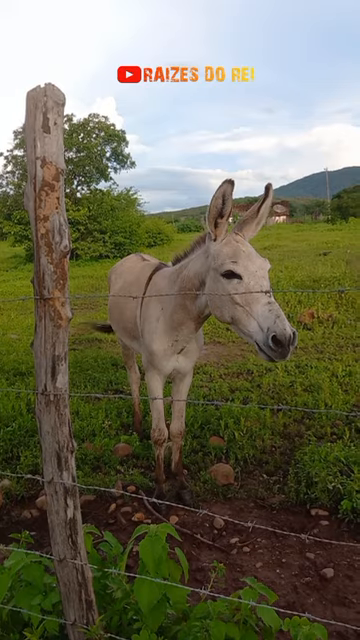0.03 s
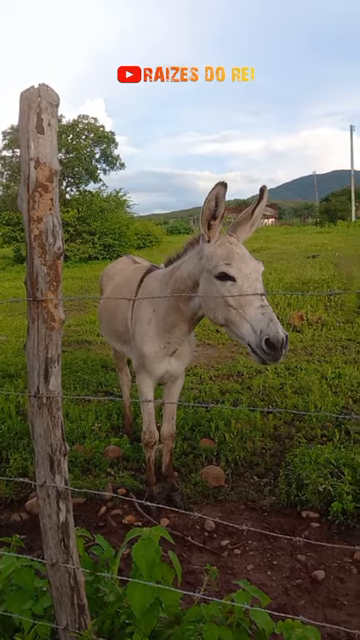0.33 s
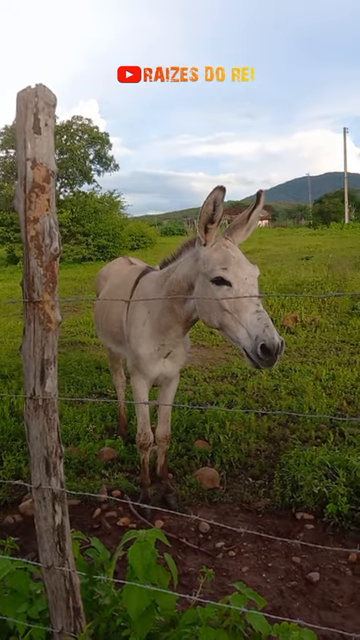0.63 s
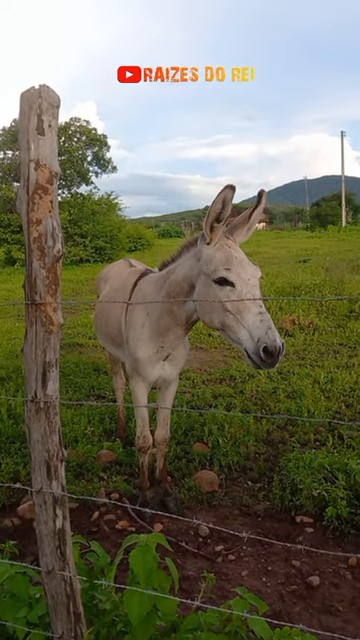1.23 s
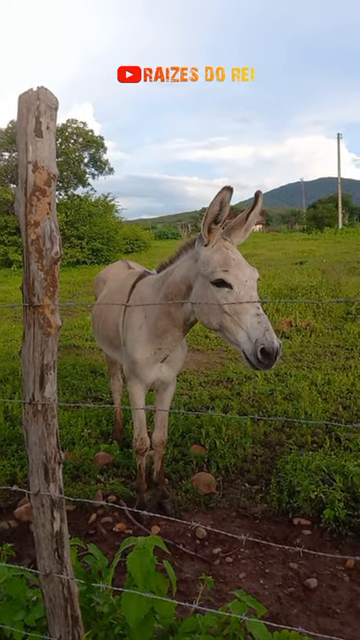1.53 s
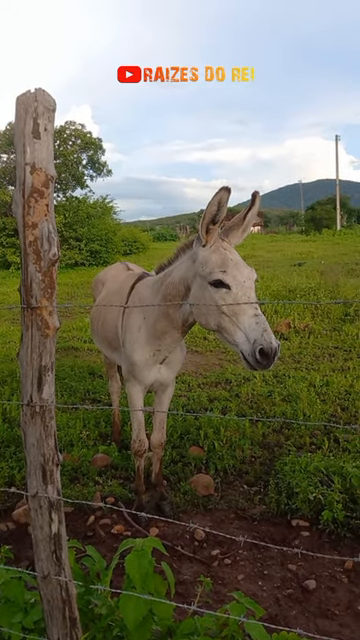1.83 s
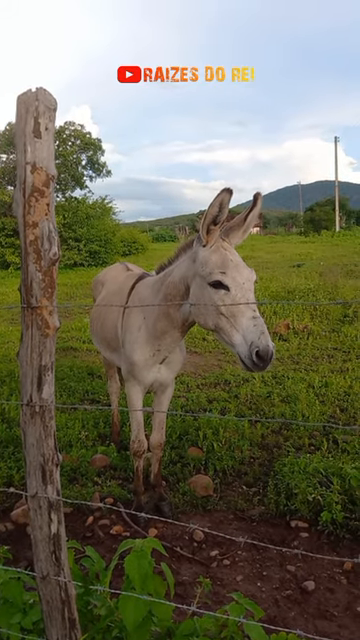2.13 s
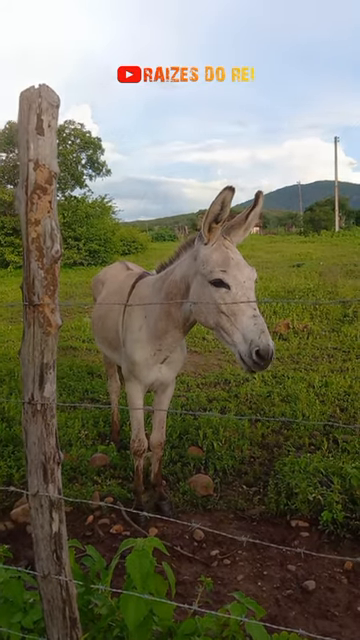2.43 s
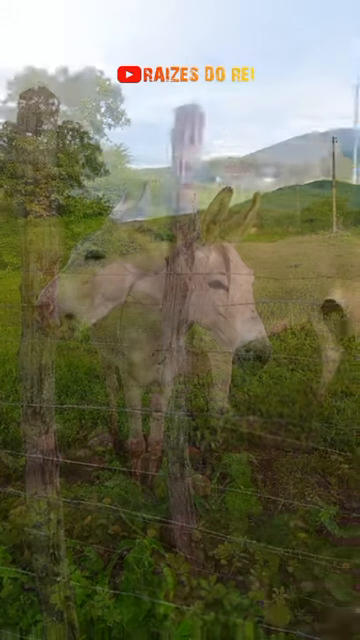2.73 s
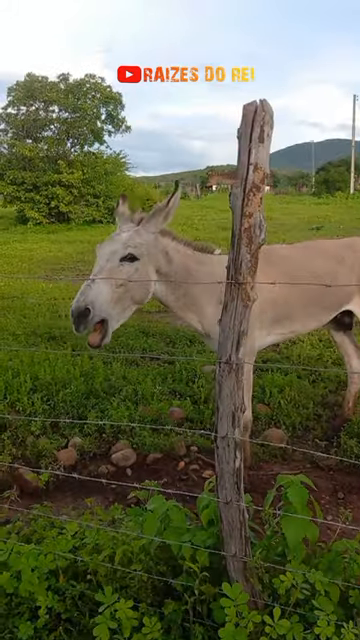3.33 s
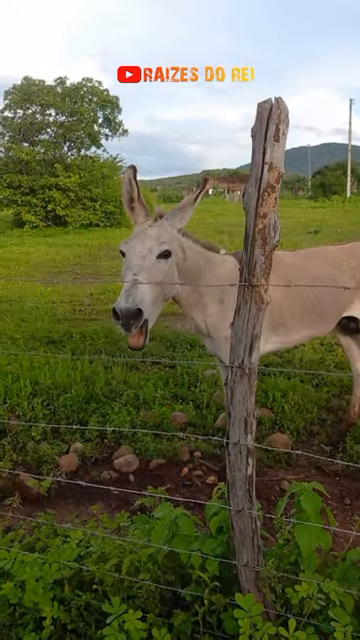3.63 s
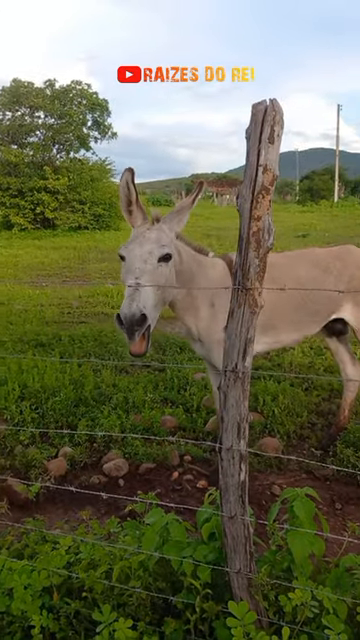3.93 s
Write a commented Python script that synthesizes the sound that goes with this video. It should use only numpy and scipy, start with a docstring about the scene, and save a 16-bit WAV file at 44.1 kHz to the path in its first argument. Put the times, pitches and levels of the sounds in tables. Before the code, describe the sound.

A donkey close to the microphone gives four fluttering grunts between wheezy gasps, moans softly, then brays a loud, whistling hee-haw-hee. Further off in a quiet field, a bird repeats a faint falling cry.

```python
"""An open pasture, where a donkey at a fence works up to a bray: four fluttering grunts with wheezy
gasps between, a soft moan, then hee - haw - hee. Each hee is a whistle over rasping air drawn through
tight vocal folds, the haw is a clean brassy out-stroke, and the voice croaks where it changes register.
Further off, a bird repeats an arched, falling cry over the low hush of the field."""
import sys
import numpy as np
from scipy import signal
from scipy.fft import rfft, irfft
from scipy.io import wavfile

SR = 44100
rng = np.random.default_rng(int(sys.argv[2]) if len(sys.argv) > 2 else 0)


def bounce(signal):
    """Save signal as a 16-bit WAV file at the path given by the first command-line argument."""
    frames = np.transpose(np.atleast_2d(signal))
    limited = np.clip(frames, -1, 1)
    pcm = np.round(limited * 32767).astype(np.int16)
    wavfile.write(sys.argv[1], SR, pcm)


N = 176400
T, HZ = np.arange(N) / SR, np.fft.rfftfreq(N) * SR


def from_db(db):
    """Decibels to gain."""
    return 10 ** (np.asarray(db) / 20)


def unit_rms(x):
    """Scale to an rms of 1."""
    return x / np.sqrt(np.mean(x ** 2) + 1e-20)


def at_hz(curve, hz):
    """Read a curve of (frequency, value) points on a log-frequency axis."""
    freqs, values = np.transpose(curve)
    return np.interp(np.log(hz + 1e-3), np.log(freqs), values)


def filtered(x, hz, kind="low", order=2):
    """Butterworth filter."""
    return signal.sosfilt(signal.butter(order, hz, kind, fs=SR, output="sos"), x)


def wobble(rate_hz):
    """Smooth random modulation, rms 1."""
    return unit_rms(filtered(rng.standard_normal(N), rate_hz))


def air(colour, correlation=.88):
    """Stereo turbulence, rms near 1, rolled off below the first point of its colour."""
    low_cut = np.minimum(HZ / colour[0][0], 1) ** 2
    mid, side = irfft(rfft(rng.standard_normal((2, N))) * from_db(at_hz(colour, HZ)) * low_cut, N)
    width = np.sqrt((1 - correlation) / (1 + correlation))
    return unit_rms(mid) + width * unit_rms(side) * np.array([[1], [-1]])


def swell(start, hold, db, fade_db_per_s, attack_s):
    """Envelope: a ramp centred on the start, a hold, then a steady fade in dB."""
    attack = np.clip((T - start) / attack_s + .5, 0, 1)
    return attack * from_db(db - fade_db_per_s * np.maximum(T - start - hold, 0))


def tone(hz, gain, partials_db):
    """Harmonics on a pitch curve; their levels are a list or a function of frequency."""
    on, out = gain > 1e-5, np.zeros(N)
    k = np.arange(1, 21 if callable(partials_db) else len(partials_db) + 1)[:, None]
    weight = from_db(partials_db(k * hz[on]) if callable(partials_db) else np.vstack(partials_db))
    waves = np.sin(2 * np.pi * k * np.cumsum(hz[on]) / SR + np.pi * rng.random(k.shape))
    out[on] = gain[on] * sum(weight * waves) / np.sqrt(sum(weight ** 2) / 2)
    return out


def placed(x, pan, left_lead_s=.00008):
    """Pan a sound band by band, the left side arriving slightly early."""
    ratio = from_db(at_hz(pan, HZ))
    left = ratio * np.exp(2j * np.pi * HZ * left_lead_s)
    sides = np.array([left, np.ones_like(HZ)]) * 2 / (1 + ratio)
    response = np.roll(irfft(sides, N), 256, axis=1)[:, :513]
    return signal.fftconvolve(np.broadcast_to(x, (2, N)), response, "same", axes=1)


# colour of the ambience bed: (frequency [Hz], level [dB])
FIELD_AIR = [(110, 0), (500, -19), (4500, -27), (8000, -40)]

def field_hush():
    """A faint, steady bed of low air."""
    return from_db(-66) * air(FIELD_AIR)


# flap hits: (time [s], thump level [dB], puff level [dB])
FLAPS = [(.433, -23, -35), (.524, -26, -35), (.802, -24, -28), (.839, -21, -32), (.867, -17, -36),
         (1.177, -21, -23), (1.218, -18, -30), (1.244, -12, -37), (1.585, -20, -38), (1.623, -19, -27),
         (1.653, -18, -38)]
# chest resonances: (frequency [Hz], gain [dB], t60 [s])
CHEST_MODES = [(125, -13, .05), (330, 1, .025), (630, -8, .018)]
# breaths out and in: (time [s], hold [s], level [dB]); GASPS opens with a brief breath out at 0 s, the rest are
# in-breaths
GRUNTS = [(.375, .13, -39), (.795, .11, -39), (1.175, .12, -34), (1.555, .14, -35)]
GASPS = [(0, .015, -28), (.122, .135, -37), (.595, .06, -50), (.995, .05, -50)]
# their colours, dark and wheezy: (frequency [Hz], level [dB])
GRUNT_AIR = [(110, -1), (330, 0), (850, -14), (2050, -11), (2700, -27), (4700, -22), (8000, -54),
             (14500, -48)]
GASP_AIR = [(280, -10), (620, -3), (1150, -8), (1600, 2), (1780, -4), (2050, 1), (2700, -22), (4600, -14),
            (7000, -48)]
# stereo position: (frequency [Hz], left over right [dB])
GRUNT_PAN = [(300, 1), (2000, -7)]

def grunts_and_gasps(flap_hz=31, flap_depth_db=4, trim_db=-3):
    """Slow flaps thump the chest and let out puffs; air flutters out with them and is gasped back, after one
    short breath out at the very start."""
    clicks, puffs = np.zeros(N), np.zeros(N)
    for start, thump_db, puff_db in FLAPS:
        clicks[int(start * SR)] = from_db(thump_db)
        puffs += swell(start + .001, hold=.006, db=puff_db, fade_db_per_s=1500, attack_s=.001)
    soft_clicks = filtered(clicks, [70, 1100], "band")
    thumps = sum(from_db(db) * ring(soft_clicks, hz, t60) for hz, db, t60 in CHEST_MODES)
    outflow = np.zeros(N)
    for start, hold, db in GRUNTS:
        flutter = from_db(flap_depth_db * np.cos(2 * np.pi * flap_hz * (T - start)))
        outflow += swell(start, hold, db, fade_db_per_s=230, attack_s=.015) * flutter
    gasps = sum(swell(*gasp, fade_db_per_s=400, attack_s=.035) for gasp in GASPS)
    breath = outflow * air(GRUNT_AIR) + (puffs + gasps) * air(GASP_AIR)
    breath *= from_db(1.8 * wobble(60))
    return from_db(trim_db) * placed(thumps + breath, GRUNT_PAN)


def ring(x, hz, t60):
    """One resonance of chest or throat; a unit click rings at height 1."""
    radius, angle = from_db(-60 / (t60 * SR)), 2 * np.pi * hz / SR
    return signal.lfilter([0, np.sin(angle)], [1, -2 * radius * np.cos(angle), radius ** 2], x + 1e-18)


# bird cues: (time [s], level [dB])
CRIES = [(.295, -52), (.765, -45), (1.2, -40), (1.635, -42), (2.013, -47), (2.355, -49)]
# contour of one cry: (time into cry [s], pitch [Hz], relative level [dB])
CRY_CONTOUR = [(0, 950, -22), (.018, 1200, -6), (.04, 1275, 0), (.08, 1100, -1), (.115, 850, -18)]
# its harmonics, fundamental first: (level [dB])
CRY_PARTIALS = [0, -7, 0, -5, -23, -25]

def bird(jitter=.011):
    """Each cry arches up and slides down, rich in harmonics and grainy with fast pitch jitter."""
    times, pitches, contour_db = np.transpose(CRY_CONTOUR)
    grain, cries = np.exp(jitter * wobble(500)), np.zeros(N)
    for start, db in CRIES:
        hz = np.interp(T, start + times, pitches) * grain
        gain = from_db(db + np.interp(T, start + times, contour_db, -np.inf, -np.inf))
        cries += tone(hz, gain, CRY_PARTIALS)
    return cries


# the soft moan and the brassy haw: (time [s], hold [s], pitch [Hz], level [dB])
MOAN = (2.282, .125, 417, -43)
HAW = (3.077, .285, 300, -15.5)
# their harmonics, fundamental first: (level [dB])
MOAN_PARTIALS = [0, -2, -10, -24]
HAW_PARTIALS = [0, -15, -9, -26, -2, -18, -27, -20, -33, -42, -48, -38, -31, -29, -42, -39]
# throat formants, shared with the croaks: (frequency [Hz], level [dB])
THROAT = [(350, 0), (560, -9), (950, 3), (1380, -2), (1700, -14), (2200, -9), (2700, -27), (3800, -17),
          (4800, -22), (6500, -52)]
# stereo position of the voice: (frequency [Hz], left over right [dB])
VOICE_PAN = [(900, 3), (4000, -14)]
VOICE_FADE_DB_PER_S, VOICE_ATTACK_S = 900, .025

def out_stroke(note, partials_db, jitter=.003, flutter=.04, breath_db=-24):
    """A steady note voiced on the out-breath, with a little air in it."""
    start, hold, pitch_hz, db = note
    gain = swell(start, hold, db, VOICE_FADE_DB_PER_S, VOICE_ATTACK_S)
    hz = pitch_hz * np.exp(jitter * wobble(120))
    voice = tone(hz, gain * np.exp(flutter * wobble(80)), partials_db)
    return placed(voice + from_db(breath_db) * gain * air(THROAT), VOICE_PAN)


# register breaks: (time [s], hold [s], first pitch [Hz], last pitch [Hz], level [dB], roughness [0-1])
CROAKS = [(2.51, .035, 370, 315, -34, .2), (2.555, .09, 375, 360, -33, .9),
          (2.885, .06, 380, 348, -26, .35), (3.058, .025, 420, 390, -25, .8),
          (3.365, .04, 330, 436, -24, .7), (3.49, .035, 358, 312, -24, .3), (3.54, .07, 363, 350, -27, .9),
          (3.845, .047, 352, 352, -27, .4), (3.982, .03, 440, 440, -22, .6)]

def croaks(breath_db=-8):
    """Folds beat unevenly into the throat, whose lowest resonance rings on."""
    jitter, flutter = .075 * wobble(260), .25 * wobble(170)
    voice, flow = np.zeros(N), np.zeros(N)
    for start, hold, first_hz, last_hz, db, rough in CROAKS:
        hz = np.interp(T, [start, start + hold], [first_hz, last_hz]) * np.exp(rough * jitter)
        gain = swell(start, hold, db, VOICE_FADE_DB_PER_S, VOICE_ATTACK_S)
        voice += tone(hz, gain * unit_rms(np.exp(rough * flutter)), lambda f: at_hz(THROAT, f))
        flow += gain * rough
    voice += from_db(-24) * ring(np.gradient(voice), hz=352, t60=.11)
    breath = from_db(breath_db) * flow * air(THROAT)
    return placed(filtered(voice + breath, 255, "high", order=6), VOICE_PAN)


# whistle glides: (start [s], end [s], first pitch [Hz], last pitch [Hz], level [dB])
WHISTLES = [(2.605, 2.662, 4800, 4600, -28), (2.667, 2.845, 2185, 2110, -23),
            (2.842, 2.875, 4500, 4470, -27), (3.582, 3.616, 4620, 4680, -18),
            (3.617, 3.724, 2212, 2165, -12), (3.737, 3.797, 2160, 2122, -14.5),
            (3.808, 3.828, 2110, 2075, -23)]
# harmonics of the lower whistles, fundamental first: (level [dB])
WHISTLE_PARTIALS = [0, -13, -40]
# rasping in-breaths: (time [s], hold [s], level [dB])
RASPS = [(2.61, .24, -28), (3.59, .22, -25.5)]
# their colour: (frequency [Hz], level [dB])
RASP_AIR = [(600, -13), (1150, -9), (1490, 4), (1680, -6), (1900, 0), (2500, -17), (3300, -13), (3650, -5),
            (4700, -4), (5800, -30), (6800, -26), (8200, -42), (15000, -37)]
# their stereo position: (frequency [Hz], left over right [dB])
RASP_PAN = [(700, 0), (4300, -17), (6500, -4)]

def hees(whistle_pan_db=-17):
    """Air drawn through tight folds rasps and whistles; the high register is a pure tone."""
    jitter, flutter = np.exp(.0045 * wobble(260)), np.exp(.09 * wobble(150))
    whistle = np.zeros(N)
    for start, end, first_hz, last_hz, db in WHISTLES:
        hz = np.interp(T, [start, end], [first_hz, last_hz]) * jitter
        gain = swell(start, end - start, db, fade_db_per_s=1100, attack_s=.012) * flutter
        whistle += tone(hz, gain, WHISTLE_PARTIALS if first_hz < 3000 else [0])
    inflow = sum(swell(*breath, fade_db_per_s=380, attack_s=.04) for breath in RASPS)
    rasp = inflow * air(RASP_AIR) * from_db(1.8 * wobble(200))
    return placed(rasp, RASP_PAN) + placed(whistle, [(SR, whistle_pan_db)])


def echo(send, t60=.38, cutoff_hz=5000, onset_s=.02):
    """Dull scatter from trees and ground."""
    t = T[:SR]
    tail = filtered(rng.standard_normal((2, SR)), cutoff_hz)
    tail *= from_db(-60 * t / t60) * np.minimum(t / onset_s, 1)
    return signal.fftconvolve(send, unit_rms(tail) / np.sqrt(SR), axes=1)[:, :N]


def scene():
    """Donkey close and nearly dry, bird further off and wetter, the field's hush underneath."""
    donkey = grunts_and_gasps() + out_stroke(MOAN, MOAN_PARTIALS)
    donkey += out_stroke(HAW, HAW_PARTIALS) + croaks() + hees()
    cries = bird()
    scatter = echo(from_db(-27) * donkey + from_db(-10) * cries)
    return donkey + cries + scatter + field_hush()


def record(dry, stopband_hz=16450):
    """Clip peaks at full scale and cut the very top steeply."""
    return signal.sosfilt(signal.cheby2(14, 70, stopband_hz, fs=SR, output="sos"), np.clip(dry, -1, 1))


dry = scene()
out = record(dry)
bounce(out)
```